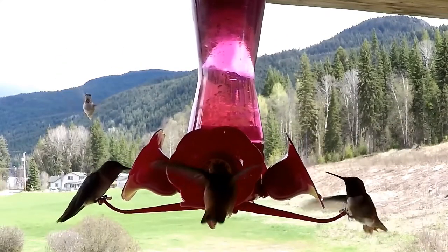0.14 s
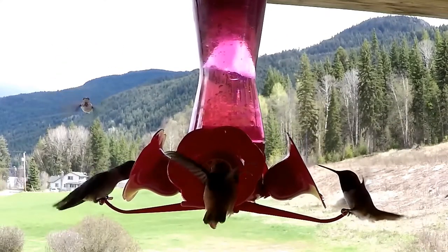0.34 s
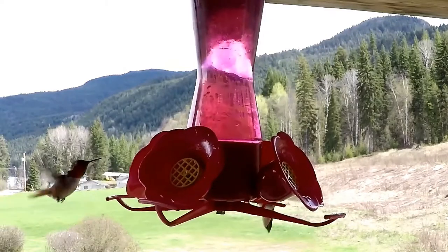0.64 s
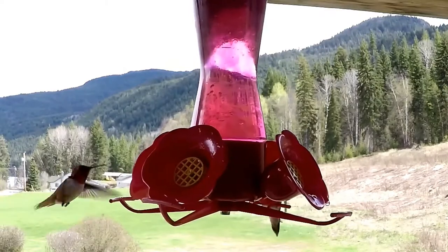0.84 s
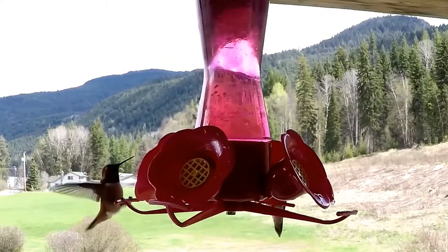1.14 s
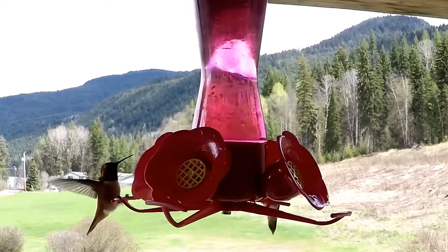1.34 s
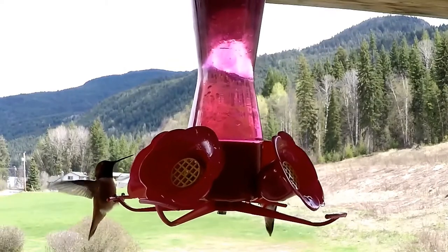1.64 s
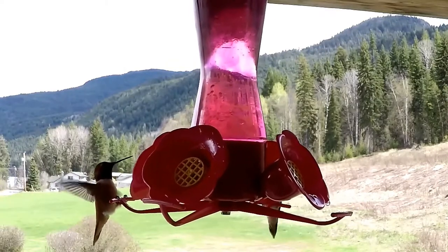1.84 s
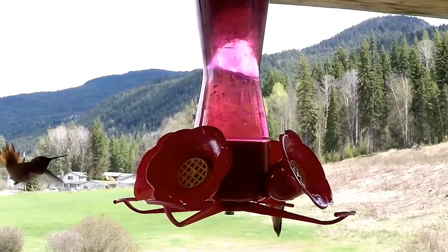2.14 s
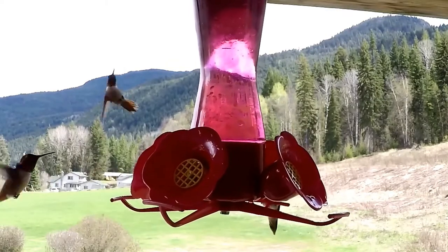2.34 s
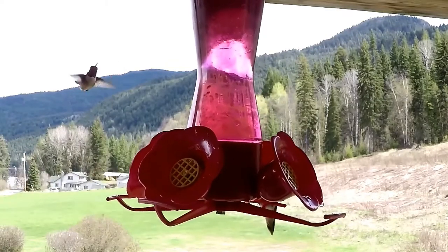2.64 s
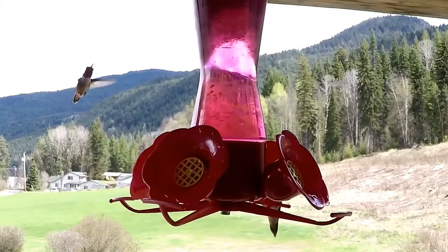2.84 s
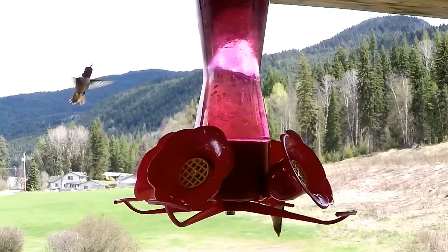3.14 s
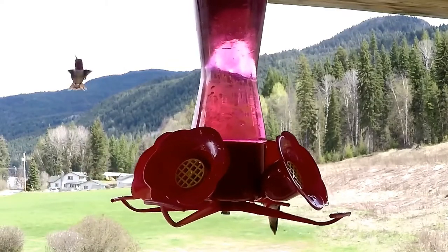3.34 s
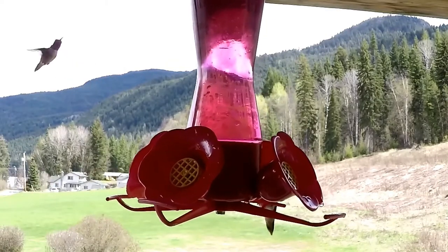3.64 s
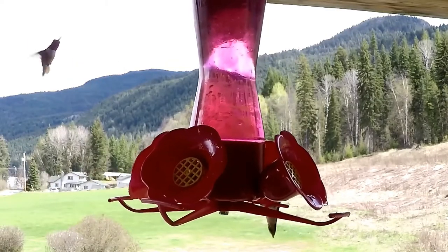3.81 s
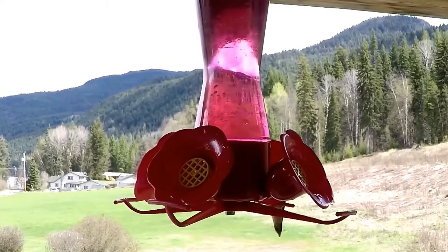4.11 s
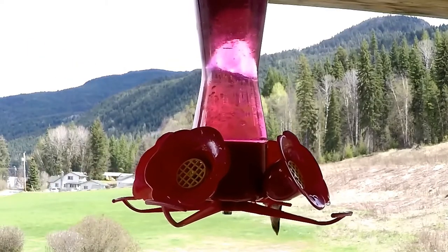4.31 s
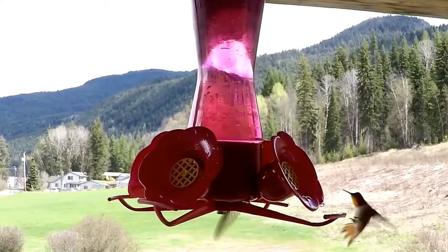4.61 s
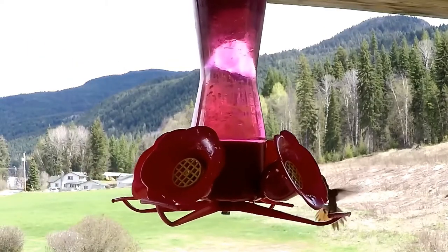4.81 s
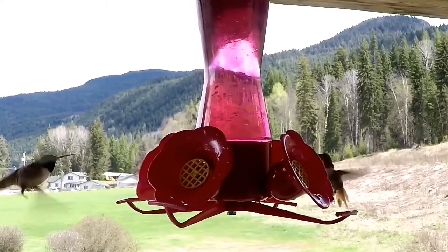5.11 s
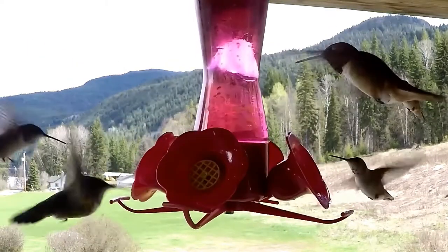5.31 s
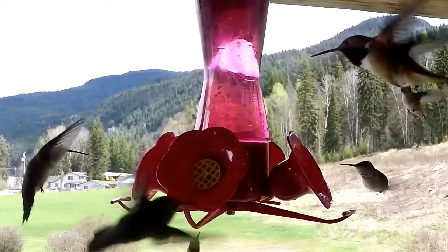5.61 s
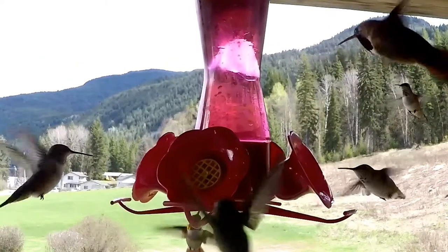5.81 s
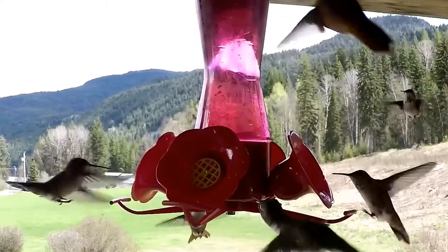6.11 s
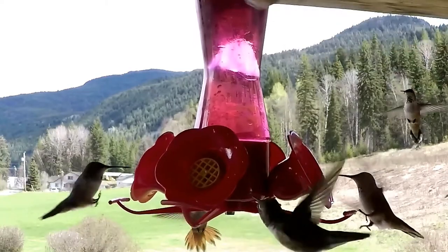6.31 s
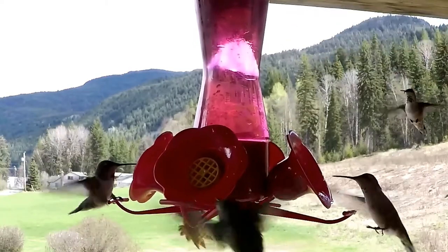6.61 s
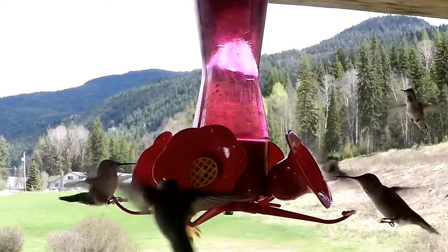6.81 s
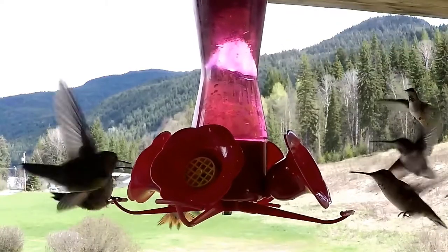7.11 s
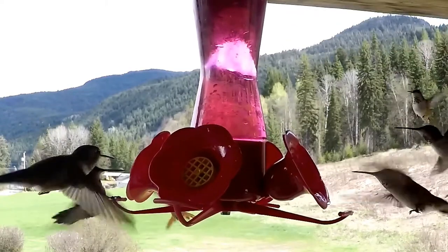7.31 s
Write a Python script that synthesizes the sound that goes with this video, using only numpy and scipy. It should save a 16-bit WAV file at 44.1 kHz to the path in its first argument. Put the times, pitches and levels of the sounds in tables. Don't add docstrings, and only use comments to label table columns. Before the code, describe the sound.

Hummingbirds hum and chip around an outdoor feeder, briefly slowed and muffled, then crisp at true speed, then dropping into deep, dull slow motion.

```python
import sys
import numpy as np
from scipy import signal
from scipy.io import wavfile

SR = 44100
rng = np.random.default_rng(int(sys.argv[2]) if len(sys.argv) > 2 else 0)


def volts_from_db(level):
    exponent = np.asarray(level, float) / 20
    return 10 ** exponent


def dump_mix(stems):
    frames = np.atleast_2d(stems).T
    limited = np.clip(frames, -1, 1)
    pcm = np.round(limited * 32767).astype(np.int16)
    wavfile.write(sys.argv[1], SR, pcm)


N = 328677



def at_hz(points, hz):
    points_hz, points_db = np.transpose(points)
    return np.interp(np.log(hz), np.log(points_hz), points_db)


def rms_one(x):
    return x / np.sqrt(np.mean(x ** 2) + 1e-20)


def in_time(rows, t):
    s, *columns = np.transpose(rows)
    return [np.interp(t, s, column) for column in columns]


def drift(t, rate):
    points = rng.standard_normal(4000)
    return np.interp((t - t[0]) * min(rate, 500), np.arange(4000), points)


def fade(t, edge_s):
    return np.minimum(1, np.minimum(t - t[:1], t[-1:] - t) / edge_s)


def filtered_noise(t, low_hz, high_hz=None):
    white = rng.standard_normal(len(t))
    if high_hz is None:
        return signal.lfilter(*signal.butter(2, low_hz, fs=SR), white)
    return signal.sosfilt(signal.butter(2, [low_hz, high_hz], "band", fs=SR, output="sos"), white)


def banded_noise(t, spectrum, slow, patchy_db):
    out = 0
    edges = 12 * 2 ** np.arange(0, 10.5, .35)
    white = rng.standard_normal((2, len(t)))
    together = drift(t, 9 / slow)
    for i, (low, high) in enumerate(zip(edges, edges[1:])):
        band_filter = signal.butter(2, [low, high], "band", fs=SR, output="sos")
        band = signal.sosfilt(band_filter, white[i % 2])
        level_db = at_hz(spectrum, np.sqrt(low * high) * slow)
        out = out + band * volts_from_db(level_db + patchy_db * (together + drift(t, 20 / slow)))
    return rms_one(out)


# f/Hz, level/dB (per Hz)
AIR = [
    [(8.2, -26), (14, 1.5), (42, -16.5), (178, -22), (392, -19.5), (574, -37), (823, -27), (3380, -50),
     (4300, -57), (5590, -78), (9460, -120)],
    [(8.2, -31), (14, 5.5), (43, 0.5), (66, 0), (134, -10.5), (447, -18), (931, -21.5), (1720, -30.5),
     (5410, -33.5), (8920, -45), (9740, -22.5), (12700, -54.5), (15600, -45.5)],
    [(8.2, -22.5), (14, 0.5), (42, -4.5), (107, -14), (506, -31), (1380, -35), (1820, -29.5), (2240, -50),
     (2880, -48.5), (3300, -66), (4290, -103), (7260, -120)],
]
AIR_DB = [-49, -50, -46]


def meadow_air(t, k):
    return volts_from_db(AIR_DB[k]) * banded_noise(t, AIR[k], 0.93, patchy_db=.7)


def insect_whine(t, slow):
    return volts_from_db(-81) * drift(t, 300) * np.sin(2 * np.pi * 12250 / slow * t)


# start t/s, loudest t/s, end t/s, f/Hz when loudest, level/dB
DASHES = [(-.04, -0, 0.048, 2445, -50), (0.046, .16, 0.34, 2490, -71), (.5, .552, 0.7, 9400, -44.5),
          (.78, .85, 1.14, 8130, -62), (.94, 1.0, 1.02, 8480, -53), (2.11, 2.22, 2.37, 10240, -47.5),
          (2.23, 2.27, 2.53, 9070, -53.5), (2.47, 2.52, 2.84, 9370, -47), (2.99, 3.05, 3.72, 8800, -68),
          (3.25, 3.335, 3.48, 8840, -47), (3.359, 3.401, 3.69, 9860, -40.5), (3.57, 3.6, 3.84, 9275, -45),
          (3.81, 3.95, 4.23, 9620, -46), (4.06, 4.226, 4.55, 10270, -42.5), (4.399, 4.5, 4.64, 9350, -43.5),
          (4.62, 4.65, 4.75, 9750, -45), (4.74, 4.85, 5.19, 9785, -46.5), (5.16, 5.22, 5.47, 1842, -44.5),
          (5.51, 5.525, 5.9, 1765, -44.5), (5.66, 5.68, 7.8, 1964, -52.5), (5.74, 5.99, 6.25, 1904, -46),
          (6.17, 6.2, 6.2, 1888, -48), (6.76, 6.8, 7.33, 1915, -48), (6.87, 7.041, 7.25, 1875, -46)]
# t/s, f/Hz, level/dB
HOVER = [
    (1.05, 9620, -63.5),
    (1.4, 10100, -62),
    (1.7, 10070, -65),
    (1.78, 10100, -74),
]


def flights(k):
    rise_per_s, sag_per_s = [.02, .4, .08][k], [.05, .3, .15][k]
    dash_scatter, hover_scatter = [1.1, 1.2, 0.614][k], 0.32
    out = []
    for start, loudest, end, hz, db in DASHES:
        first_hz = hz * (1 - rise_per_s * (loudest - start))
        last_hz = hz * (1 - sag_per_s * (end - loudest))
        rows = [(start, first_hz, db - 11.5), (loudest, hz, db), (end, last_hz, db - 14)]
        out.append((rows, dash_scatter))
    return out + [(HOVER, hover_scatter)]


# nearest t/s, lingers t/s, beat f/Hz as at true speed,
# hum level/dB, level/dB of the second order over the first
PASSES = [(.57, 0.084, 73, -48, 0), (1.03, 0.079, 70, -54, 3), (1.32, 0.068, 67, -64, 0.5),
          (1.66, 0.061, 77, -56, -9), (2.11, 0.038, 69, -47, -0.5), (2.25, .1, 72, -45.5, -3),
          (2.58, 0.051, 72, -44, -5), (2.72, 0.038, 72, -45.5, -1.5), (2.87, .05, 70, -44.5, -0.5),
          (3.05, 0.067, 72, -52.5, 4), (3.2, 0.076, 67, -50, 1), (3.43, 0.091, 73, -37, -4.5),
          (3.64, 0.055, 73, -47.5, -1.5), (3.92, .14, 72, -52, 3), (4.25, 0.1, 72, -41, 0),
          (4.48, .04, 72, -48, 1), (4.68, 0.083, 72, -42.5, 0), (4.87, 0.06, 71, -44.5, -1.5),
          (5.08, 0.16, 67, -48, 1),
          (.1, .2, 69, -45, 3),
    (.42, .08, 62, -50, 10),
    (5.36, .15, 60, -43, 4),
    (5.66, .12, 66, -36, -3),
    (5.96, .2, 70, -37, -4),
    (6.62, .25, 66, -40, 0),
    (6.98, .2, 68, -41, 2),
    (7.38, .15, 68, -42, 1),
]


def passing(t, slow, k):
    here = [row for row in PASSES if t[0] <= row[0] <= t[-1]]
    s, lingers, beats, db, second_db = np.transpose(here)[:, :, None]
    away = (t - s) / (lingers * np.where(t < s, .6, 1))
    power = volts_from_db(2 * db) / (1 + np.abs(away) ** 3.5)
    second_power = power * volts_from_db(2 * second_db)
    first_level_db = 10 * np.log10(power.sum(axis=0))
    second_level_db = 10 * np.log10(second_power.sum(axis=0))
    both_db = 10 * np.log10(((power + second_power) / 2).sum(axis=0))
    rest_db = -62
    efforts_db = []
    for rows, _ in flights(k):
        row_s, _, row_db = np.transpose(rows)
        efforts_db.append(np.interp(t, row_s, row_db, rest_db, rest_db))
    effort_db = np.maximum(np.max(efforts_db, axis=0), rest_db)
    both_db = both_db + 0.16 * (effort_db - rest_db)
    beat_hz = (power * beats).sum(axis=0) / power.sum(axis=0) / slow
    upper_db = both_db + [-12, -6.5, -15][k]
    wash_db = both_db + [-12, -10.5, -15][k]
    return beat_hz, first_level_db, second_level_db, upper_db, wash_db


# multiple of the beat, level/dB
UPPER_ORDERS = [(3, -1), (4, -2.5), (5, -11), (6, -11), (7, -15.5), (8, -9), (9, -12.5), (10, -19.5),
                (11, -16.5)]
# f/Hz, level/dB (per Hz)
DOWNWASH = [(88, -24.5), (150, -8), (178, -20), (282, -13.5), (318, -15.5), (353, -17.5), (3500, -46.5),
            (4550, -84.5), (7700, -120)]


def wings(t, slow, k):
    beat_hz, first_db, second_db, upper_db, wash_db = passing(t, slow, k)
    phase = 2 * np.pi * np.cumsum(beat_hz * (1 + .012 * drift(t, 25 / slow))) / SR

    def order(multiple):
        strength = np.sqrt(2) * volts_from_db(3.8 * drift(t, 30 / slow))
        return strength * np.sin(multiple * phase + 1.13 * drift(t, 14 / slow))

    upper = rms_one(sum(volts_from_db(db) * order(multiple) for multiple, db in UPPER_ORDERS))
    puffs = 1 + 0.3 * np.cos(phase)
    wash = rms_one(banded_noise(t, DOWNWASH, slow, patchy_db=2.0) * puffs)
    rub = filtered_noise(t, 3380 / slow, 8500 / slow)
    rustle = rms_one(rub * np.exp(.7 * np.cos(phase)))
    hum = volts_from_db(first_db) * order(0.97) + volts_from_db(second_db) * order(2) + volts_from_db(upper_db + 0.5) * upper
    return hum + volts_from_db(wash_db + 5.5) * wash + volts_from_db(upper_db - 17.5) * rustle, phase


def trill(t, phase, slow, k):
    out = np.zeros(len(t))
    beat_number = (phase / (2 * np.pi) + .5).astype(int)
    luck = rng.standard_normal((600, 2))[beat_number]
    burst = np.exp(5.4 * (np.cos(phase) - 1))
    shimmer = rms_one(filtered_noise(t, 400 / slow))
    gusts = volts_from_db(1.8 * drift(t, 150 / slow))
    for rows, scatter in flights(k):
        on = (t > rows[0][0]) & (t < rows[-1][0])
        hz, level_db = in_time(rows, t[on])
        glide = 1 + scatter * (.018 * luck[on, 1] - .03 * np.sin(phase[on]))
        tone = np.sin(2 * np.pi * np.cumsum(hz * glide) / SR)
        flutter = 1.01 * burst[on] * volts_from_db(5.0 * scatter * luck[on, 0]) * tone
        other_tone = np.sin(2 * np.pi * np.cumsum(hz * (1 - 0.03 * scatter)) / SR)
        other = (shimmer * gusts)[on] * other_tone
        out[on] += volts_from_db(level_db + 1.5) * fade(t[on], .006) * (flutter + .55 * other)
    return out


EAVE_DB = [-6, -8, -1]
WET_DB = [-3, 3, 4.5]


def echoes(x, slow, k):
    eave_t60_s, wall_t60_s, wall_lag_s, post_lag_s = .045, 0.28, 0.016, 0.0043
    lag = np.arange(int(.3 * slow * SR)) / SR / slow
    grain = rng.standard_normal((2, len(lag)))
    eave = volts_from_db(EAVE_DB[k]) * grain[0] * volts_from_db(-60 * lag / eave_t60_s) * (lag > .0012)
    eave = eave / np.sqrt(eave_t60_s * slow * SR / 14)
    late = lag - wall_lag_s
    wall = volts_from_db(-11 + WET_DB[k]) * grain[1] * volts_from_db(-60 * late / wall_t60_s) * np.clip(late / 0.021, 0, 1)
    wall = wall / np.sqrt(wall_t60_s * slow * SR / 14)
    eave[round(post_lag_s * slow * SR)] += volts_from_db(-12.5)
    return signal.fftconvolve(x, eave + wall)[:len(x)]


OVERTONES_DB = [1.5, -6, -9.5, -16, -30]
# f/Hz, level/dB
THROAT = [(1200, -24.5), (2600, -11.5), (3900, -10), (5000, -2), (6100, 0), (7300, -4), (8500, -6),
          (11000, -8), (16000, -20.5)]


def voice(hz, level_db, slow, bright_db, rough):
    shake = rng.standard_normal((2, len(hz) + 400))
    shake = signal.lfilter(*signal.butter(2, 900 / slow, fs=SR), shake)[:, 400:]
    shake = shake * np.sqrt(slow * SR / 2000)
    phase = 2 * np.pi * np.cumsum(hz * (1 + .09 * rough ** 2 * shake[0])) / SR
    tones = 0
    for multiple, db in enumerate(OVERTONES_DB, 1):
        true_hz = multiple * hz * slow
        tone_db = db + bright_db * (multiple > 1) + at_hz(THROAT, true_hz)
        tones = tones + volts_from_db(tone_db) * np.sin(multiple * phase) * (true_hz < 17000)
    return volts_from_db(level_db) * (1 + 0.83 * rough * shake[1]) * tones


# t/s, peak level/dB, times longer, share of the usual pitch, overtones level/dB
CHIPS = [(0.4635, -29, 1.15, 1.03, -3.5), (0.563, -31.5, 1.03, 0.96, -1.1), (0.7384, -51.5, 1.34, 1.1, -2),
         (0.913, -30.5, 1.36, 1, -3), (1.101, -52.5, 0.73, 1.05, -12), (1.194, -54, 1.1, 1.03, -5.2),
         (1.4043, -48.5, 0.52, 1.1, -12), (1.462, -54.5, 1.01, 0.99, -7), (1.6933, -53, 1, 1, 2),
         (2.0571, -43, 1.1, 0.96, -4), (2.0806, -30, 1.14, 1.06, -2.3), (2.1918, -30, 0.98, 1.04, -2.5),
         (2.501, -54, 1.09, 1.2, -2.2), (2.561, -28.5, 1.02, 1.04, -1.5), (2.7181, -31.5, 0.87, 0.92, 4.5),
         (2.979, -31.5, 0.9, 0.93, 4), (3.2386, -39.5, 0.98, 0.97, 0), (3.3262, -30, 0.91, 0.99, 5.5),
         (3.6403, -34.5, 1.23, 1.07, -4), (3.926, -32, 1.33, 1.04, -2), (4.0351, -32, 0.65, 0.91, 1),
         (4.496, -35.5, 1.11, 1.15, 2.5), (4.571, -33, 1.14, 1.166, -0.5), (4.7586, -30, 0.58, 1.19, 7)]
# t/s from its onset, f/Hz, level/dB
CHIP_SHAPE = [
    (-.004, 9050, -10.5),
    (-.002, 8290, -8),
    (.0005, 6048, -2.5),
    (.003, 4272, -9),
    (.005, 3134, 1),
    (.009, 2300, -4),
    (.015, 1680, -6.5),
    (.019, 1485, -9.5),
]


def chips(t, slow):
    out = np.zeros(len(t))
    for s, db, longer, share, bright_db in CHIPS:
        on = (t > s + longer * CHIP_SHAPE[0][0]) & (t < s + longer * CHIP_SHAPE[-1][0])
        hz, shape_db = in_time(CHIP_SHAPE, (t[on] - s) / longer)
        out[on] += voice(share * hz, db + shape_db + 0.5, slow, bright_db, rough=.17)
    return out


# t/s, length t/s, attack t/s, release t/s, level/dB
WARBLES = [
    (0.496, .195, 0.028, 0.069, -53.5),
    (5.662, .75, .03, .07, -38.5),
    (7.381, 0.15, .01, 0.033, -37.5),
]
# swings per s, low f/Hz, high f/Hz, overtones level/dB
WARBLE_TONES = [
    (100, 5500, 9700, -12),
    (21.51, 1088, 1930, 1),
    (67, 1076, 1442, -1.5),
]


def warbles(t, slow):
    out = np.zeros(len(t))
    uneven_swing, uneven_level = drift(t, 110 / slow), drift(t, 160 / slow)
    for (s, length, attack, release, level_db), tones in zip(WARBLES, WARBLE_TONES):
        rate, low_hz, high_hz, bright_db = tones
        on = (t > s) & (t < s + length)
        age = t[on] - s
        edge_db = -14.5 * np.clip(1 - np.minimum(age / attack, (length - age) / release), 0, 1)
        swings = rate * age * (1 - .07 * age / 2)
        swing = .5 + .5 * np.cos(2 * np.pi * swings - 1.2 + .25 * uneven_swing[on])
        hz = low_hz + (high_hz - low_hz) * swing ** 1.15
        db = level_db + edge_db - 4.5 * age + 2.5 - 3.8 * swing + 0.91 * uneven_level[on]
        dulled_db = bright_db + edge_db / 2 - 7.5 * age
        out[on] += voice(hz, db, slow, dulled_db, rough=.38 + .15 * age)
    return out


# t/s, peak level/dB, ring f/Hz, t60 t/s, rattle level/dB
KNOCKS = [
    (1.627, -44, 377.8, 0.17, -13),
    (3.383, -38, 1220, 0.025, -4.5),
    (5.522, -59, 433, 0.049, 11.5),
    (6.502, -46.5, 300.6, 0.017, 6),
    (7.266, -46.5, 300, 0.046, 6.5),
    (7.417, -44, 327, 0.066, 6.5),
]


def knocks(t):
    out, white = np.zeros(len(t)), rng.standard_normal(len(t))
    for s, db, hz, t60, rattle_db in KNOCKS:
        age = np.maximum(t - s, 0)
        ring = np.sin(2 * np.pi * hz * age)
        rattle = rms_one(signal.lfilter(*signal.butter(2, 2.4 * hz, fs=SR), white))
        out += (t > s) * volts_from_db(db - 60 * age / t60) * (ring + volts_from_db(rattle_db) * rattle)
    return out


# (t/s, length t/s, top f/Hz, end f/Hz, level/dB)
SLURS = [
    ((.55, -1.5, 0, .26, -2, -6), [(4.001, .067, 6500, 5030, -41.5), (4.736, .054, 6500, 4770, -40)]),
    ((.24, 1.1, 0, .45, -5, -16), [(6.37, .23, 1465, 471, -44)]),
    ((0, 1.5, 0, 1.4, 2, -10), [(4.835, .06, 3250, 2200, -55)]),
    ((0, 3.5, .3, .5, -5, -16), [(5.051, .046, 3500, 1610, -48)]),
    ((0, 3.5, .1, .5, 1, -10), [(5.159, .036, 8290, 2200, -45)]),
    ((0, 11.0, .38, .5, -3, -10), [(4.929, .069, 4940, 2050, -46)]),
    ((0, 6.0, .15, .55, -3, -14), [(6.865, .325, 1150, 435, -48)]),
]


def slurs(t, slow):
    out = np.zeros(len(t))
    for (held, bend, sag, rough, bright_db, fade_db), rows in SLURS:
        for s, length, top_hz, end_hz, level_db in rows:
            on = (t > s) & (t < s + length)
            done = (t[on] - s) / length
            loudest = max(held, .18)
            falling = np.clip((done - held) / (1 - held), 0, 1)
            fall = (1 - sag) * np.expm1(-bend * falling) / np.expm1(-bend) + sag * falling
            climb = 1 - .06 * np.clip(1 - 2 * done / (held + 1e-9), 0, 1) ** 2
            hz = top_hz * (end_hz / top_hz) ** fall * climb
            swell = -5.5 * np.clip(1 - done / loudest, 0, 1)
            dying = fade_db * np.clip((done - loudest) / (1 - loudest), 0, 1) ** 1.5
            db = level_db + swell + dying + 3.0 - at_hz(THROAT, hz * slow)
            out[on] += fade(t[on], 0.0022 * slow) * voice(hz, db, slow, bright_db, rough)
    return out


# start t/s, end t/s, times slower, top of the sound f/Hz
PASSAGES = [
    (0, .4525, 4, 4130),
    (.4525, 5.195, 1, 15450),
    (5.195, 7.453, 5, 3090),
]


def scene():
    parts = []
    for k, (start, end, slow, top_hz) in enumerate(PASSAGES):
        t = np.arange(round(start * SR), min(round(end * SR), N)) / SR
        hum, phase = wings(t, slow, k)
        tips = trill(t, phase, slow, k)
        birds = chips(t, slow) + warbles(t, slow) + slurs(t, slow)
        whole = meadow_air(t, k) + insect_whine(t, slow) + hum + tips + birds + knocks(t)
        whole = whole + echoes(birds + 0.3 * tips, slow, k)
        top_filter = signal.ellip(10, .5, 70, top_hz, fs=SR, output="sos")
        parts.append(signal.sosfilt(top_filter, whole))
    return np.concatenate(parts)[None, :N]


def roll_off(x):
    return signal.sosfilt(signal.butter(12, 15720, fs=SR, output="sos"), x)


def record(dry):
    mix = dry + volts_from_db(-94.5) * rng.standard_normal(dry.shape)
    return roll_off(mix)


dry = scene()
out = record(dry)
dump_mix(out)
```